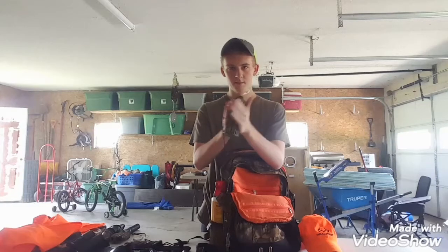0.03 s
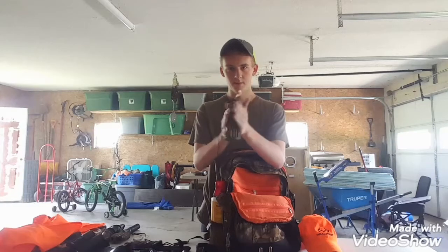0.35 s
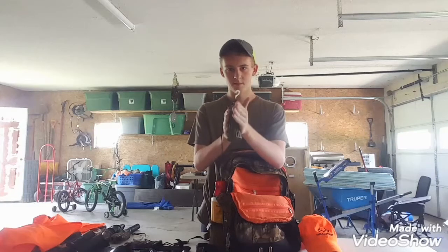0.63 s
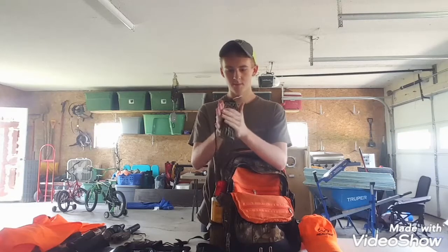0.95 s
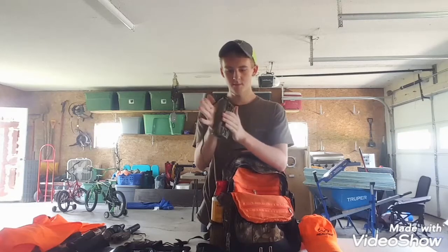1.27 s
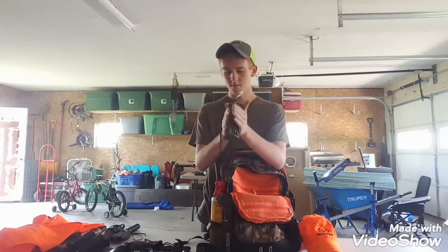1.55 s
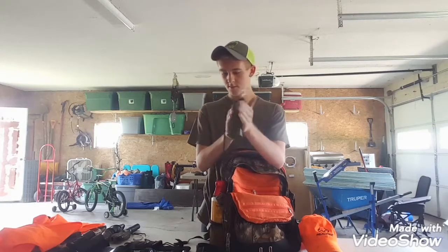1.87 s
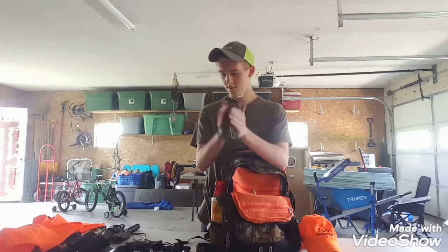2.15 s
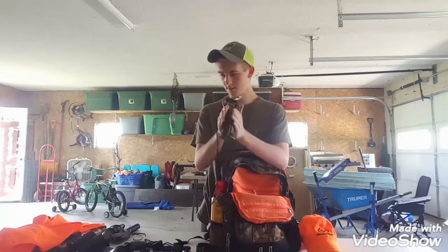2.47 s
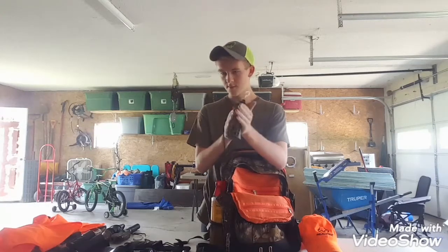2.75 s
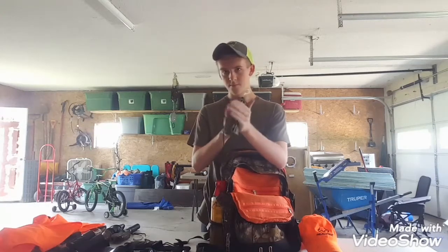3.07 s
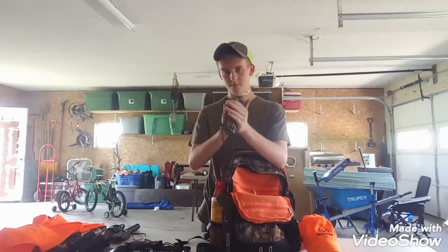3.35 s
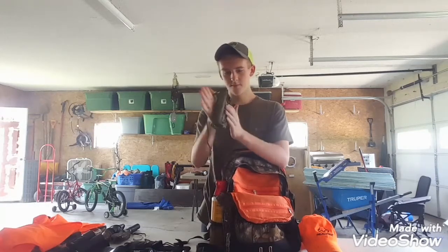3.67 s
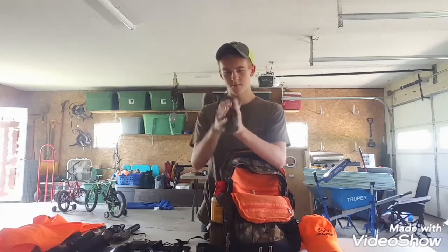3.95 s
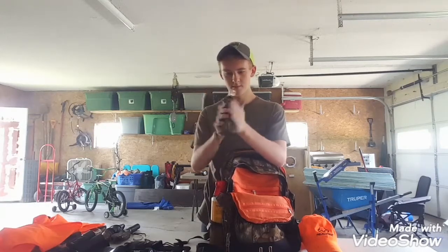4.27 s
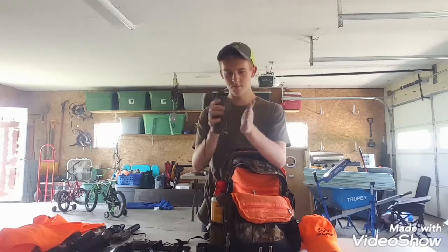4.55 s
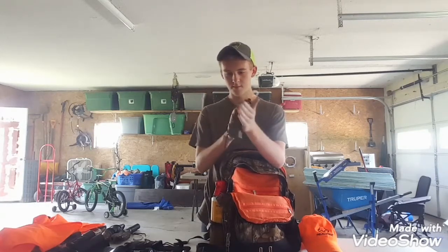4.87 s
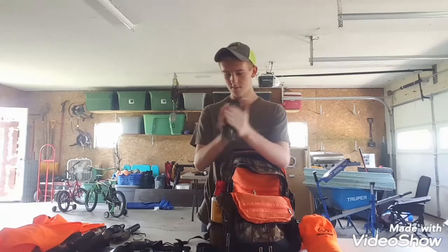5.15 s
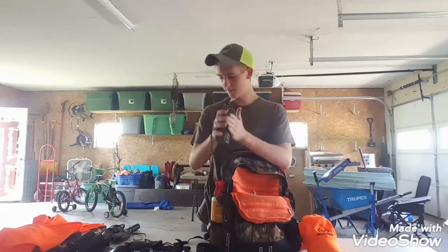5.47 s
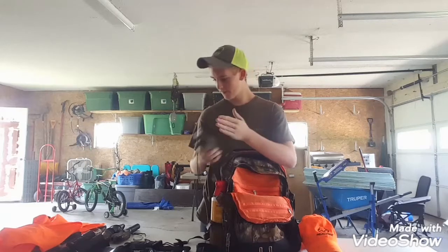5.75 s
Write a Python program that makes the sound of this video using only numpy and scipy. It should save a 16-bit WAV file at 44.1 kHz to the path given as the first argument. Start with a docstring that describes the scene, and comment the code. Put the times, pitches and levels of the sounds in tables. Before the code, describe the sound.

Hard sticks clatter inside a small bag as someone works it between the hands in a quiet garage. The clacks start at once and come in irregular bursts, about two a second, some light and some sharp, with a few brief pauses and a dense flurry near the end. The sound is close and almost centred, with a short reverberation from the walls and a barely audible electrical hum beneath.

```python
"""Bag of rods in a garage

A bag of hard rods is rolled and slapped between two hands, a step away. Each clack is a light touch,
the blow, a rebound, then loose rods settling at random. The rods ring briefly in their bending modes,
damped by each other and the cloth. The ceiling and walls answer, over still air and a faint mains hum."""
import sys
import numpy as np
from scipy import signal
from scipy.fft import rfft, irfft, next_fast_len
from scipy.io import wavfile

SR = 44100
rng = np.random.default_rng(int(sys.argv[2]) if len(sys.argv) > 2 else 0)


def waveform_to_disk(signal):
    """Save audio, clipped to [-1, 1], as 16-bit WAV at the path in sys.argv[1]."""
    frames = np.transpose(np.atleast_2d(signal))
    scaled = np.clip(frames, -1, 1) * 32767
    samples = np.round(scaled).astype(np.int16)
    wavfile.write(sys.argv[1], SR, samples)


N = 256468

# Cue list of clacks. Ring is against the crack, edge and knock against a usual blow, rebound against its own.
# start_s, level_db, pitch_hz, ring_db, edge_db, knock_db, rebound_db
CLACK_CUES = [(-0.035, -17.5, 2295, -7, 2.5, 0.5, -14), (0.092, -33, 1990, 2, 0.5, -3.5, -17.5),
              (0.136, -33, 2064, -0.5, 0.5, -12, -11.5), (0.214, -12, 2260, -2.5, 0, -6, -16.5),
              (0.236, -19.5, 2210, -1.5, 6, 1, -8.5), (0.2775, -19, 3170, -21, 2, 3.5, -8.5),
              (0.286, -14, 2640, 1, -1, -4, -2.5), (0.5123, -10.5, 2062, -2, 9, -1.5, -4.5),
              (0.58, -21.5, 2230, -11, 4, -4, -17), (0.839, -27.5, 1760, -44, -12.5, -8, -11),
              (0.8475, -24, 1962, -4, -0.5, 1.5, 5.5), (0.9701, -23, 2192, 8, -10.5, 4.5, -23),
              (1.3215, -31, 1570, -3, -1, -4, -19), (1.3343, -19.5, 1957, -5, 2, -4.5, 1.5),
              (1.535, -22, 2080, -2, 2.5, 6.5, -6), (1.558, -14.5, 2057, -1, 5, 3, -4),
              (1.6548, -19, 2183, 0.5, 0, -5, -19), (1.6717, -15.5, 2250, 2.5, 4.5, 7.5, -18.5),
              (1.9851, -27, 2920, -10, -3, 2.5, -25), (2.0255, -17, 1940, -12, -0.5, -5.5, -14),
              (2.111, -28, 2440, -4.5, 2, -6.5, -11), (2.2837, -16.5, 2320, -2.5, 5.5, -1, -26),
              (2.3255, -25.5, 2530, -9, 3.5, 5.5, -18.5), (2.3539, -12, 2054, -1, 7, 2, -39),
              (2.437, -29.5, 1840, -4, -17, 5, -1.5), (2.724, -43, 2450, -21, -11, 1, -6),
              (2.752, -12.5, 2134, 1, 3, -0.5, -13), (2.7839, -24, 2140, -5.5, 13.5, 9.5, -8),
              (2.8168, -22, 1680, -18, -11, -11, -14), (3.1913, -41, 2100, -6, -13, 1, -4),
              (3.239, -48, 1820, 1, -7, -17, -22), (3.2601, -23, 1810, -14.5, 0, 3, -35),
              (3.276, -20, 2355, -0.5, 6.5, 0.5, -31), (3.58, -44, 2260, -3, -1, 4, -1),
              (3.6223, -14.5, 1673, -5.5, 7, 4.5, -14), (3.6313, -20.5, 2390, 18, -4.5, -4, -34),
              (3.8, -22, 2792, -2.5, -7, -9, -29), (4.017, -35, 1940, -4, -4, -2, 0),
              (4.0505, -30.5, 2980, -2, -3, 4.5, -10), (4.1013, -33.5, 3000, -6, 5.5, -7, -8),
              (4.153, -26, 2024, -3, 1, 2, -12), (4.1703, -19, 2480, -1.5, 10, 6, -16),
              (4.2447, -17, 2490, 0.5, 8.5, 5.5, -7.5), (4.4131, -25, 2470, -2.5, 6.5, 3, -10),
              (4.472, -17.5, 2250, -0.5, 14.5, 5.5, -10), (4.779, -27.5, 2294, 7.5, -3, 5, -32),
              (4.8189, -13.5, 2520, 1.5, 13, 7.5, -7.5), (4.8784, -21, 2140, -12, 5.5, 5, -13),
              (4.9408, -19, 2064, 0.5, 5.5, 0.5, -10), (4.9726, -25, 2090, -6, 1.5, -2, -26),
              (5.2889, -31, 2110, 7.5, 10.5, 8.5, -21), (5.3084, -18.5, 2570, -2, 3.5, -8.5, 1.5),
              (5.3379, -15, 2560, -7.5, 12, -2, 3), (5.3571, -12.5, 2410, 1.5, 6.5, -4, -3),
              (5.3903, -14, 1520, -2.5, 5.5, -1, -2), (5.4044, -17.5, 2116, -1.5, 12.5, 1.5, -5.5),
              (5.618, -31.5, 1920, -4.5, -6, 4, -12), (5.6642, -33, 3070, 1.5, 1, -3.5, 9),
              (5.722, -20, 2484, -2, 3.5, 6, -16)]


def rattling_bag(lean_right_db):
    """Every clack arrives by the direct path with its early reflections, and as garage reverb."""
    out = np.zeros((2, N))
    for start_s, *blow in CLACK_CUES:
        ahead, around = clack(*blow, loose_rods=2)
        path = near_path(delay_scatter=.12)
        add(out, start_s - TOUCH_LEAD_S, signal.fftconvolve(ahead[None], path, axes=1))
        reverb = garage_reverb(tail_db=-1.0, build_s=0.0084, clutter_db=0.0, clutter_t60_s=0.064)
        add(out, start_s - TOUCH_LEAD_S, signal.fftconvolve(around[None], reverb, axes=1))
    return out * amp([[-lean_right_db], [lean_right_db]])


TOUCH_LEAD_S, TOUCH_DB = .005, -15  # the rods touch lightly just before they snap past each other
FIRM_DB, TOUCH_LOSS = -11.5, 0.41  # blows weaker than a firm one lose the touch (dB per dB)
REBOUND_S, REBOUND_SCATTER = .012, .12  # the struck rod flies on into a neighbour
SETTLE_FROM_S, SETTLE_SPAN_S = .018, .07  # when loose rods drop back after a blow
SETTLE_DB, SETTLE_FADE_DB_PER_S = -15.5, 106  # their level against the blow, and how it falls


def clack(level_db, pitch_hz, ring_db, edge_db, knock_db, rebound_db, loose_rods):
    """Touch, blow, rebound and loose rods settling; starts at the touch."""
    train = np.zeros((2, SR // 5))
    add(train, TOUCH_LEAD_S, strike(level_db, pitch_hz, ring_db, edge_db, knock_db))
    touch = (-TOUCH_LEAD_S, TOUCH_DB + TOUCH_LOSS * min(level_db - FIRM_DB, 0))
    rebound = (REBOUND_S * np.exp(REBOUND_SCATTER * rng.standard_normal()), rebound_db)
    settle_s = SETTLE_FROM_S + SETTLE_SPAN_S * rng.uniform(0, 1, loose_rods)
    settling = [(s, SETTLE_DB - SETTLE_FADE_DB_PER_S * s) for s in settle_s]
    for after_s, relative_db in [touch, rebound] + settling:
        neighbour_hz = pitch_hz * np.exp(.09 * rng.standard_normal())
        # these side hits have a little less ring and a softer edge
        hit = strike(level_db + relative_db, neighbour_hz, ring_db - 0.5, edge_db - 2.5, knock_db)
        add(train, TOUCH_LEAD_S + after_s, hit)
    return train


# EQ of a blow, and how hard edge and low knock bend it; thin rods radiate almost no bass.
# freq_hz, usual_db, edge_db_per_db, knock_db_per_db
BLOW_EQ = [(60.4, -38.5, 1, 1), (209, -4.5, 0, 1.67), (326, -2, 0, 1.27), (547, -3, 0, 1),
           (1188, 0, 0, 0.87), (1790, 5, 0, 0), (3300, -0.5, 0, 0), (4400, 2.05, 0.7147, 0),
           (5600, -0.16, 0.69, 0.5), (7130, 1.5, 0.77, 0), (12100, -6, 1.3855, 0.5)]


def strike(level_db, pitch_hz, ring_db, edge_db, knock_db):
    """One meeting of rods: the sound sent ahead and the sound sent all around."""
    t = np.arange(SR // 18) / SR
    eq = [(hz, usual_db + by_edge * edge_db + by_knock * knock_db)
          for hz, usual_db, by_edge, by_knock in BLOW_EQ]
    ahead = rod_contacts(t, pitch_hz, ring_db, tumble_s=.009, follow_db=-8.5,
                         size_spread=.09, crack_t60_s=0.012, count=4)
    # the room gathers what all the rods radiate to all sides, which is smoother in colour
    around = rod_contacts(t, pitch_hz, ring_db - 0.5, tumble_s=.01, follow_db=-4.0,
                          size_spread=0.141, crack_t60_s=0.031, count=7)
    return amp(level_db + 22.0) * norm(coloured(np.array([ahead, around]), eq))


# Bending modes of a mid-sized rod: pitch_hz, level_db, t60_s
ROD_MODES = [(2266, 4, 0.033), (4720, -2, 0.051), (6830, -14.5, 0.045), (7870, -12, 0.018),
             (12630, -9.5, 0.026)]
# Noise colour of the dry crack of a contact: freq_hz, gain_db
CRACK_EQ = [(60, -29.5), (200, -34.5), (360, -6), (520, -11.5), (1050, 3.5), (1900, -1), (2900, 5.5),
            (3500, -0.5), (5100, -1), (6000, -9), (8500, -11), (10800, -16.5), (12300, -15.5),
            (13700, -12.5), (16000, -54.5)]


def rod_contacts(t, pitch_hz, ring_db, tumble_s, follow_db, size_spread, crack_t60_s, count):
    """One rod cracks and rings; weaker contacts between rods of other sizes follow in milliseconds."""
    lag = np.r_[0, rng.uniform(0, 1, count - 1)][:, None]
    follows = lag > 0
    age = np.maximum(t - lag * tumble_s, 0)
    # a rod that rings freely touches its neighbours less
    force = amp(np.where(follows, follow_db * (1 + lag) - max(ring_db, 0), 0)) * (age > 0)
    lowest_hz = ROD_MODES[0][0]
    tuning = pitch_hz / lowest_hz * np.exp(size_spread * follows * rng.standard_normal((count, 1)))
    ring = np.zeros(len(t))
    for hz, db, t60_s in ROD_MODES:
        # the rods are uneven, so their higher modes follow the lowest only loosely
        detune = np.exp(0.031 * (hz > lowest_hz) * rng.standard_normal((count, 1)))
        mode_hz = hz * tuning ** ((lowest_hz / hz) ** 2) * detune
        partials = force * amp(-60 * age / t60_s) * np.sin(2 * np.pi * mode_hz * age)
        ring += amp(db) * norm(np.sum(partials, axis=0))
    burst = np.sqrt(np.sum((force * amp(-60 * age / crack_t60_s)) ** 2, axis=0))
    crack = norm(coloured(burst * rng.standard_normal(len(t)), CRACK_EQ))
    return amp(ring_db - 5.0) * ring + crack


# Early reflections off ceiling, floor and shelves: delay_s, level_db
EARLY_REFLECTIONS = [(.0018, -5), (.0072, -12), (0.0163, -13.5), (.029, -14.5)]


def near_path(delay_scatter):
    """Stereo impulse response of the direct sound and the first reflections."""
    path = np.zeros((2, SR // 20))
    # the bag is almost straight ahead: its sound reaches the left side one sample earlier
    path[0, 0] = path[1, 1] = 1
    for delay_s, db in EARLY_REFLECTIONS:
        arrival_s = delay_s * np.exp(delay_scatter * rng.standard_normal())
        for side in path:
            add(side, arrival_s + .00008 * rng.standard_normal(), amp([db]))
    return path


# Decay time of the garage: freq_hz, t60_s
TAIL_DECAY = [(200, 0.14), (530, 0.81), (1400, 0.58), (3700, 0.57), (7000, 0.49), (13000, 0.38)]
# Colour of its tail: freq_hz, gain_db
TAIL_EQ = [(200, 0), (1000, -6), (2500, 2), (5000, 0.5), (9000, 2), (14000, 0.5)]


def garage_reverb(tail_db, build_s, clutter_db, clutter_t60_s):
    """Diffuse impulse response: a quick scatter off nearby clutter, then the tail of the whole room."""
    hz, frame_s, noise = signal.stft(rng.standard_normal((2, SR * 3 // 4)), SR, nperseg=256)
    decay = amp(along(TAIL_EQ, hz)[:, None] - 60 * frame_s / along(TAIL_DECAY, hz)[:, None])
    build = 1 - np.exp(-frame_s / build_s)
    tail = signal.istft(noise * decay * build, SR, nperseg=256)[1]
    t = np.arange(tail.shape[-1]) / SR
    wide, centre = rng.standard_normal(tail.shape), rng.standard_normal(len(t))
    scatter = (wide + 0.49 * centre) * amp(-60 * t / clutter_t60_s)
    return amp(tail_db) * norm(tail) + amp(clutter_db) * norm(scatter)


# Colour of the still air: freq_hz, gain_db
AIR_EQ = [(20, 1), (60, 0), (150, -5.5), (400, -11), (1500, -22), (6000, -23), (15000, -34)]
# Tones of the mains hum: pitch_hz, level_db
HUM_TONES = [(60, -85), (123, -72.5)]


def room_tone(air_db, width):
    """Still air as dark, wide noise, with a faint mains hum in the centre."""
    noise = rng.standard_normal(N) + width * rng.standard_normal((2, N))
    air = amp(air_db) * np.sqrt(N) * norm(coloured(noise, AIR_EQ))
    t = np.arange(N) / SR
    hum = sum(amp(db) * np.sqrt(2) * np.sin(2 * np.pi * hz * t) for hz, db in HUM_TONES)
    return air + hum


def amp(db):
    """Decibels to gain."""
    return 10 ** (np.asarray(db) / 20)


def norm(x):
    """Scale each channel to an energy of 1."""
    return x / np.sqrt(np.sum(x ** 2, axis=-1, keepdims=True) + 1e-20)


def along(points, hz):
    """Read a curve of (freq_hz, value) points on a log frequency axis."""
    freqs, values = np.transpose(points)
    return np.interp(np.log(hz + 1), np.log(freqs + 1), values)


def coloured(x, eq):
    """Play x through a minimum-phase EQ of (freq_hz, gain_db) points."""
    size = 2 * next_fast_len(x.shape[-1])
    gain = amp(along(eq, np.fft.rfftfreq(size, 1 / SR)))
    cepstrum = irfft(np.log(gain))
    # folded onto positive time, so nothing rings ahead of an attack
    cepstrum[1:size // 2] *= 2
    cepstrum[size // 2 + 1:] = 0
    return irfft(rfft(x, size) * np.exp(rfft(cepstrum)), size)[..., :x.shape[-1]]


def add(track, start_s, x):
    """Mix x into the track from start_s on."""
    start = round(start_s * SR)
    x, start = x[..., max(-start, 0):], max(start, 0)
    part = track[..., start:start + x.shape[-1]]
    part += x[..., :part.shape[-1]]


def scene():
    """The rattling bag in the quiet garage."""
    return rattling_bag(lean_right_db=0.64) + room_tone(air_db=-65.0, width=1.0)


def record(dry, top_hz=16300):
    """Soft-clip the highest peaks and cut everything above top_hz."""
    rounded = dry / (1 + dry ** 12) ** (1 / 12)
    size = next_fast_len(N + SR // 2)
    passband = np.fft.rfftfreq(size, 1 / SR) < top_hz
    return irfft(rfft(rounded, size) * passband, size)[:, :N]


dry = scene()
out = record(dry)
waveform_to_disk(out)
```